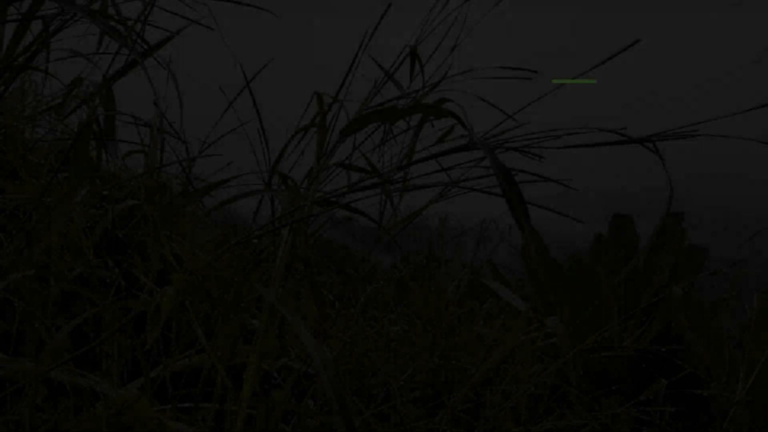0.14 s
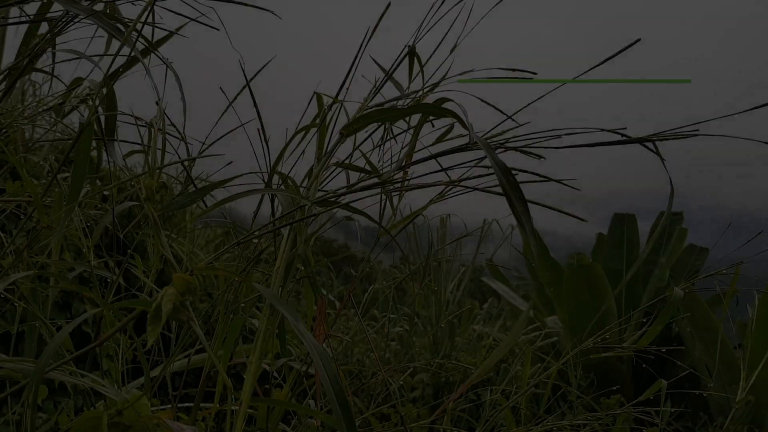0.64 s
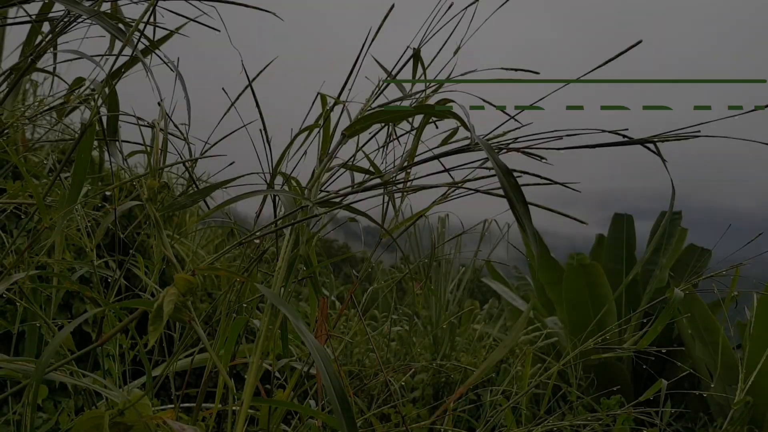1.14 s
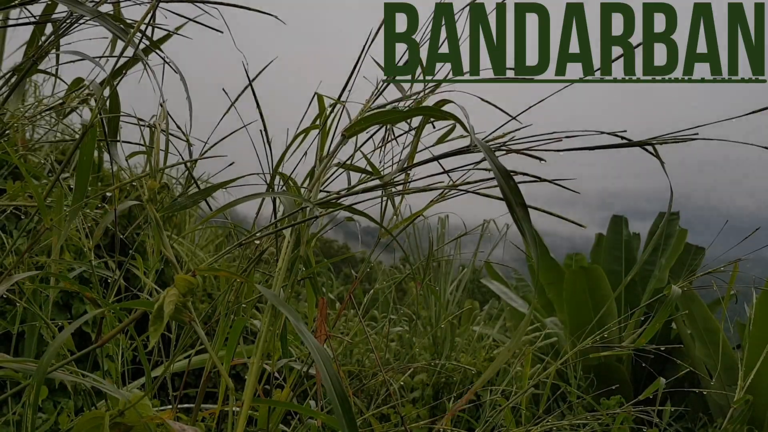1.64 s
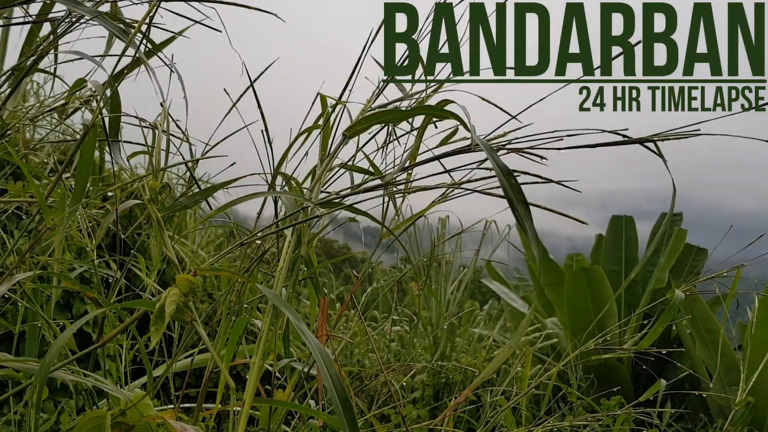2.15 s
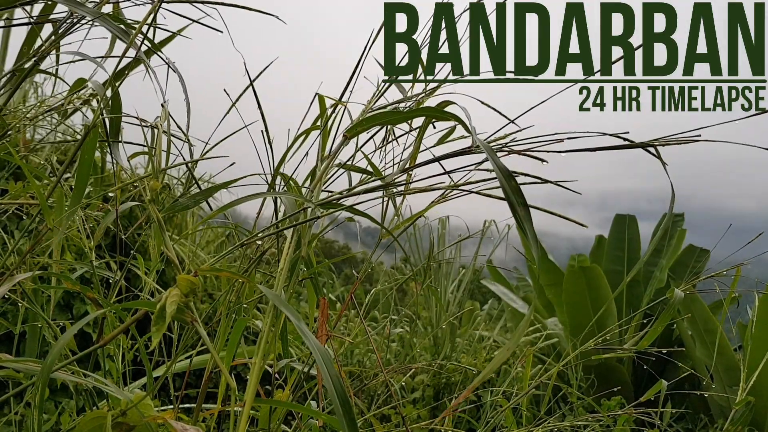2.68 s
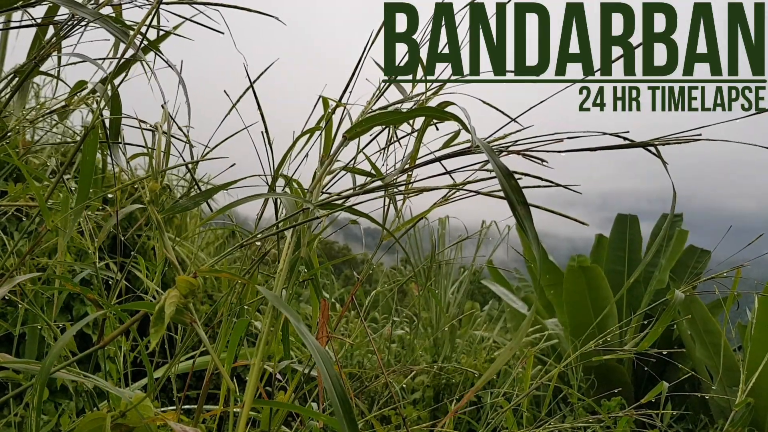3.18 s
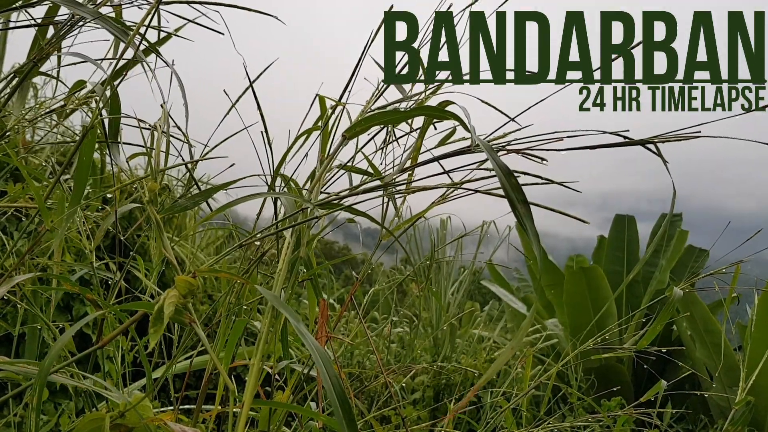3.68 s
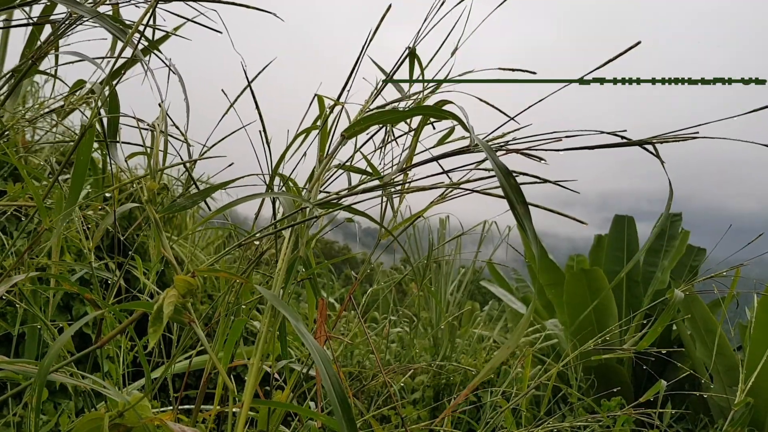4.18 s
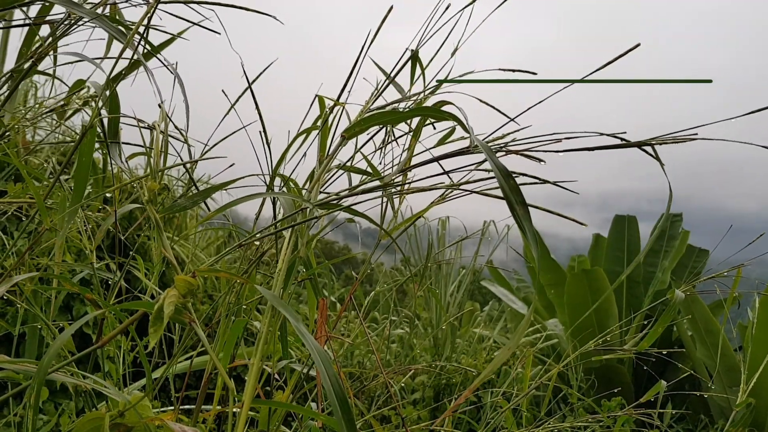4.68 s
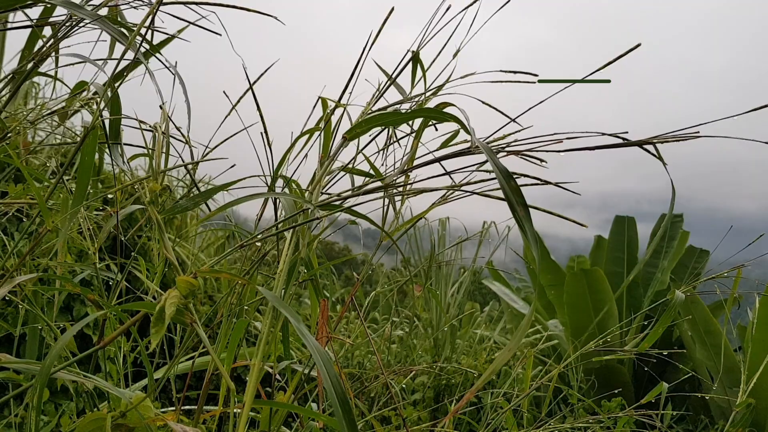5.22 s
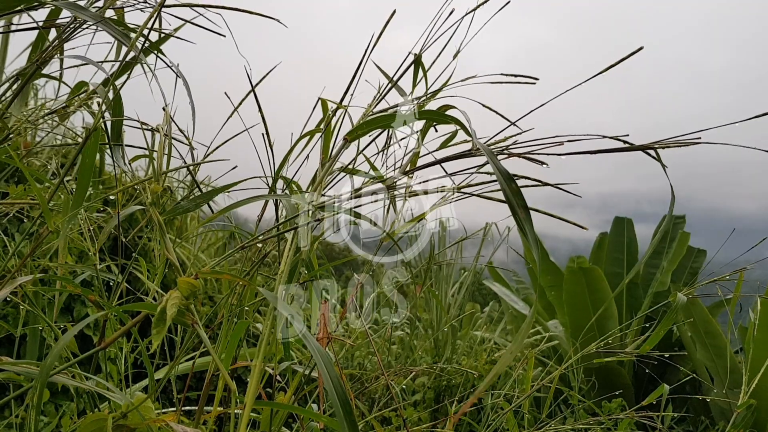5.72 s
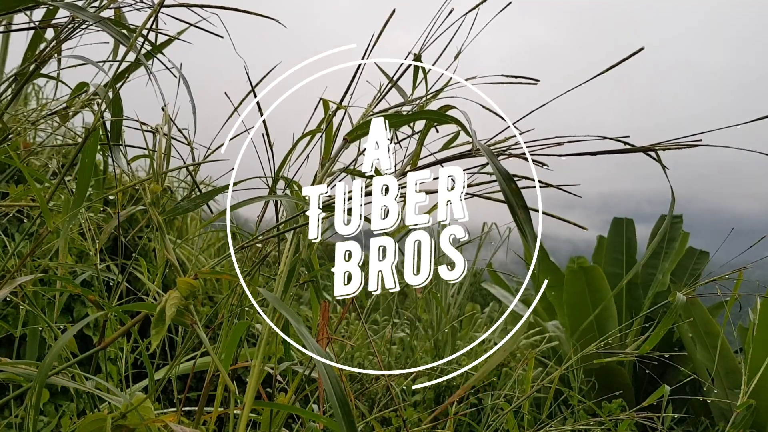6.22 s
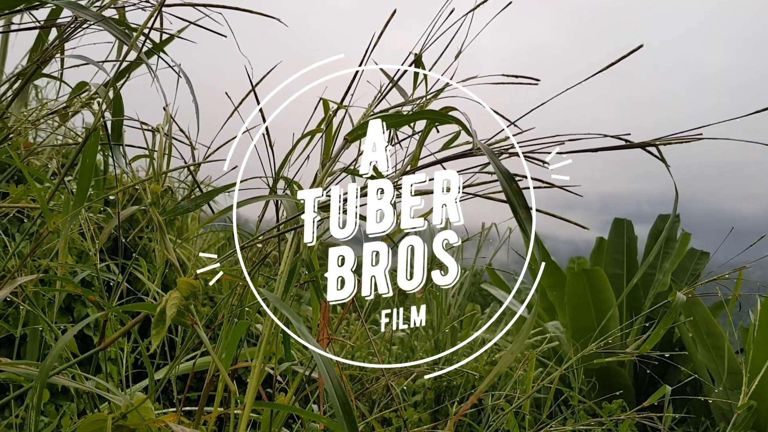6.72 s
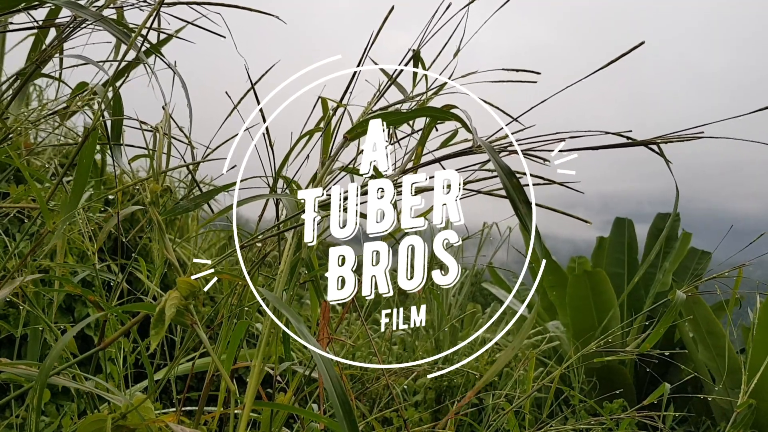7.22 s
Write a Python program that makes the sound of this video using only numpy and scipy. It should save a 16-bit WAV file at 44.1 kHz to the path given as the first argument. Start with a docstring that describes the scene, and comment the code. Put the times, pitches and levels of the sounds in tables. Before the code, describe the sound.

Outdoor grassy hillside, insects fading in over two seconds. On the right a katydid rattles nearly five times a second, a fainter one answering between beats. On the left a cricket buzzes in half-second bursts, with a thinner high buzz coming and going. A loud dry stem tick comes near 2.5 seconds, then wind gusts thump heavily on the microphone to the end.

```python
"""A grassy hillside full of insects: on the right two katydids chirp in turn, as rattles of gliding pulses.
On the left a cricket buzzes in bursts of tonal strokes and a thinner buzz of ringing clicks comes and goes
above it, while a cicada drones in throbbing harmonics and a faint insect hisses in soft swells of grainy noise.
A frog's ringing chips and far birds' gliding notes sound now and then, and stems tick as short modes. Gusts thump
on the microphone as low swings, nearly alike in both channels, over bands of noise for air and a distant chorus."""
import sys
import numpy as np
from scipy import signal
from scipy.io import wavfile
from scipy.ndimage import uniform_filter1d

SR = 44100
rng = np.random.default_rng(int(sys.argv[2]) if len(sys.argv) > 2 else 0)


def digitize_waveform(pressure):
    """Quantize a signal to 16-bit integers and store it at the path in sys.argv[1].

    Rows of a 2-D input are taken as channels; values are limited to [-1, 1].
    """
    field = np.atleast_2d(pressure).T
    bounded = np.clip(field, -1, 1)
    quanta = np.round(bounded * 32767).astype(np.int16)
    wavfile.write(sys.argv[1], SR, quanta)


def gain_from_decibels(decibels):
    """Convert decibel values to linear amplitude factors."""
    exponent = np.asarray(decibels, float) / 20
    return 10 ** exponent


N = 324576
T = np.arange(N) / SR   # time in seconds

# The strongest eddies hitting the microphone. Each row: centre in seconds, level in dB, swing rate in Hz.
EDDIES = [(0.225, -25.5, 58.4), (0.424, -25.5, 59.4), (1.199, -24, 77), (1.498, -21.5, 56),
          (1.564, -24, 67.4), (1.611, -23.5, 66), (2.079, -19.5, 60), (2.157, -19, 88), (2.265, -17, 103),
          (2.429, -17, 70.4), (2.595, -19, 86), (2.665, -16.5, 92), (2.722, -25, 70), (2.983, -11.5, 81),
          (3.034, -17, 80), (3.068, -13.5, 103), (3.123, -16.5, 97.5), (3.201, -18, 59), (3.265, -5, 84),
          (3.293, -11.5, 69.6), (3.394, -12, 92), (3.451, -17.5, 75), (3.549, -11.5, 96),
          (3.689, -16.5, 92), (3.848, -18.5, 56.6), (3.904, -11.5, 64.6), (3.962, -8, 82),
          (4.123, -8.5, 71), (4.259, -3.5, 98), (4.445, -12, 75.6), (4.56, -9, 78.7), (4.701, -16, 70),
          (4.77, -10.5, 124), (5.019, -5.5, 87), (5.064, -16, 76.5), (5.271, -14.5, 89), (5.301, -8, 114),
          (5.323, -12, 127), (5.493, -15, 77), (5.652, -26, 90), (5.682, -12.5, 61.5), (5.837, -13.5, 93),
          (5.893, -11, 71.5), (5.939, -12, 112), (6.022, -15, 122), (6.215, -12, 82), (6.301, -14.5, 69),
          (6.344, -11.5, 82), (6.382, -11, 58), (6.447, -17, 80), (6.515, -3.5, 101), (6.627, -9, 92),
          (6.708, -10.5, 84.5), (6.757, -10.5, 94), (6.837, -12.5, 92), (6.873, -9.5, 83),
          (7.004, -10.5, 66), (7.059, -15, 82), (7.224, -9, 69), (7.303, -11.5, 77)]
# Wind rumble between the thumps. Each row: time in seconds, rms level in dB.
RUMBLE_LEVEL = [(0.0, -37.5), (0.24, -40), (1.0, -39), (1.37, -36.5), (1.74, -36), (2.99, -32.5),
                (3.18, -28.5), (3.71, -30), (3.94, -30), (4.3, -30.5), (4.65, -24.5), (5.27, -28),
                (5.76, -33), (6.03, -25), (6.48, -32), (7.28, -28.5), (7.36, -29.5)]
# Spectrum of the rumble. Each row: frequency in Hz, relative density in dB per Hz.
RUMBLE_SPECTRUM = [(12, -56), (20, 4), (59, 3), (106, -7), (167, -11.5), (420, -45), (600, -39.5),
                   (780, -57), (1320, -120)]
# Spectrum of the air noise. Each row: frequency in Hz, relative density in dB per Hz.
AIR_SPECTRUM = [(88, -30), (150, -3), (391, -4), (1080, -16.5), (2360, -19.5), (4000, -22), (4320, -47.5),
                (4950, -35), (7180, -24), (14500, -25), (16000, -33)]
# Spectrum of the distant insect chorus. Each row: frequency in Hz, relative density in dB per Hz.
CHORUS_SPECTRUM = [(2000, -26), (2400, -26.5), (2750, -21.5), (3200, -14), (3800, -10), (4300, -5.5),
                   (4950, -11), (5500, -12), (6300, -13.5), (7300, -23), (9000, -11.5), (11000, -22),
                   (13600, -20), (14600, -26), (15800, -24)]
# Left-right correlation of the banded noises. Each row: frequency in Hz, correlation from -1 to 1.
LIKENESS = [(30, 1), (270, 0.98), (450, 0.89), (740, 0.71), (1200, 0.64), (2000, 0.7), (3300, -0.047),
            (5500, -0.16), (9000, 0.16), (12500, -0.018), (15000, -0.36)]
# Click rate of the cicada. Each row: time in seconds, rate in Hz.
CICADA_RATE = [(0, 306.0), (1.5, 304.7), (2.5, 302.0), (3.5, 299.7), (4.5, 297.6), (5.5, 295.3),
               (6.5, 293.8), (7.36, 292.5)]
# Cicada harmonics. Each row: time in seconds, relative levels in dB of harmonics 12, 13 and 14.
CICADA_HARMONICS = [(0, -73, -82, -90), (.55, -65.5, -66, -78), (1.0, -67, -75, -72), (1.4, -59, -60, -62),
                    (1.6, -64, -61, -60), (1.95, -57, -76, -60), (2.4, -48, -50.5, -62),
                    (2.75, -54, -53.5, -57), (3.1, -53, -49.5, -62), (3.3, -55, -57, -59),
                    (3.55, -54, -54.5, -67), (3.9, -50.5, -66, -55), (4.3, -51, -69, -62),
                    (4.75, -59, -63, -57), (5.25, -59.5, -56.5, -76), (5.8, -55, -70, -66),
                    (6.3, -58, -62, -68), (6.65, -63, -55, -70), (6.87, -57, -58, -56),
                    (7.1, -56.5, -73, -70), (7.36, -57, -74, -72)]
# Cricket bursts. Each row: start in seconds, end in seconds, length in seconds of the faint trill that follows.
CRICKET_BURSTS = [(-.5, -.02, .22), (0.637, 1.182, 0.12), (1.5417, 2.144, 0.14), (2.5545, 2.648, 0),
                  (2.7913, 3.252, 0.14), (3.584, 4.168, 0.16), (4.5338, 5.117, 0.16), (5.4875, 6.055, .28),
                  (6.454, 7.028, .31)]
# Wing strokes of one katydid chirp. Each row: delay after the beat in seconds, length in seconds,
# relative level in dB, first pitch in Hz, last pitch in Hz.
KATYDID_STROKES = [(-.0100, 0.0067, -8.5, 5275, 4400), (-.0032, 0.0049, -4.5, 4400, 5320),
                   (.0045, 0.00816, -5.5, 5364, 4464), (0.0124, 0.00386, -1, 4434, 5400),
                   (0.0188, 0.0072, -10.5, 5280, 4490), (0.0263, .0045, -8, 4650, 5000),
                   (.034, 0.0047, -13, 5160, 4750), (0.044, 0.0031, -15, 4940, 5000)]
# Far bird notes. Each row: start in seconds, length in seconds, first pitch in Hz, last pitch in Hz,
# rms level in dB before roughness and scattering, roughness from 0 to 1.
BIRD_NOTES = [(0.135, 0.028, 3940, 3790, -55, 0), (1.492, 0.12, 2050, 2010, -57.5, 0.3),
              (1.558, 0.074, 1940, 1680, -58, 0.27), (1.585, 0.077, 2290, 2010, -56.5, 0.5),
              (1.545, 0.062, 652, 653, -51.5, 0.23), (3.274, 0.1, 4950, 3590, -43.5, 0.85),
              (3.701, 0.053, 1660, 1800, -59, 0.3), (3.8, 0.051, 1890, 1940, -58, .1),
              (3.878, 0.086, 2050, 2150, -68, .1), (6.808, 0.087, 5000, 3800, -45, 0.84)]
# Frog chips. Each row: time in seconds, relative level in dB.
FROG_CHIPS = [(1.1468, -38.5), (2.9706, -30.5), (4.7182, -31.5), (6.6463, -32)]
# Faint insect hisses. Each row: centre in seconds, length in seconds, rms level at the peak in dB.
INSECT_HISSES = [(1.97, .15, -62), (3.046, 0.14, -62), (3.3, .08, -52), (3.947, 0.1, -51),
                 (4.933, 0.16, -52), (6.1, 0.13, -55), (6.815, .1, -64)]
# Stems ticking. Each row: time in seconds, relative level in dB, left over right in dB,
# tilt of the modes in dB per octave above 5 kHz.
STEM_TICKS = [(2.5366, -9.5, 0.5, 9), (3.291, -41, -3, 0), (3.584, -36, -9, 19.5), (4.9734, -37, 17, -4),
              (6.378, -33, -4, -6), (7.0042, -30, -12, -10)]
# Modes of a dry stem. Each row: frequency in Hz, relative level in dB, 60 dB decay time in seconds.
STEM_MODES = [(2740, -6, 0.021), (2870, -10, 0.013), (3800, 3.5, 0.012), (4400, -3, 0.0092),
              (5000, 4, 0.0049), (5730, 3, 0.0065), (6600, 1, .004), (8450, -19, 0.01), (9700, -12, 0.004),
              (10950, -11, 0.0067), (12200, -12, .003), (13900, -10, 0.003), (15100, -14, 0.0067)]


def rms_one(x):
    """Normalisation: divide a signal by its root mean square."""
    return x / np.sqrt(np.mean(x ** 2) + 1e-20)


def at_hz(points, hz):
    """Interpolation of a spectrum along a logarithmic frequency axis."""
    points_hz, values = np.transpose(points)
    return np.interp(np.log(hz), np.log(points_hz), values)


def band_pass(x, low_hz, high_hz):
    """Butterworth band-pass: keeps the part of a spectrum between two corners."""
    return signal.sosfilt(signal.butter(2, [low_hz, high_hz], "band", fs=SR, output="sos"), x)


def drift(rate):
    """Slow random modulation: noise through two equal poles with corners at rate (Hz), rms 1."""
    # one value every 40 samples; the first 2000 let the filter settle
    r = np.exp(-80 * np.pi * rate / SR)
    slow = signal.lfilter([1], [1, -2 * r, r * r], rng.standard_normal(N // 40 + 2002))[2000:]
    return np.interp(np.arange(N) / 40, np.arange(len(slow)), rms_one(slow))


def ring(clicks, hz, t60):
    """Damped resonance: a unit click sets off a sine of height near 1 that falls 60 dB in t60 seconds."""
    r = gain_from_decibels(-60 / (t60 * SR))
    w = 2 * np.pi * hz / SR
    return signal.lfilter([0, np.sin(w)], [1, -2 * r * np.cos(w), r * r], clicks + 1e-18)


def sweep(length_s, from_hz, to_hz):
    """Frequency glide: a tone pulse under a half-sine envelope, its pitch moving linearly."""
    n = round(length_s * SR)
    turns = np.cumsum(np.linspace(from_hz, to_hz, n)) / SR
    return np.sin(np.pi * np.arange(n) / n) * np.sin(2 * np.pi * turns)


def banded_noise(spectrum, shared_db, own_db, per_octave):
    """Band-wise noise: each stereo band has its own level, flicker and interaural correlation; total rms 1."""
    low_hz, high_hz = spectrum[0][0], spectrum[-1][0]
    edges = np.geomspace(low_hz, high_hz, int(per_octave * np.log2(high_hz / low_hz)) + 1)
    out, together = 0, drift(15.4)
    white = rng.standard_normal((2, 2, N))   # neighbouring bands use different noise
    for k, (low, high) in enumerate(zip(edges, edges[1:])):
        mid, side = band_pass(white[k % 2], low, high)
        hz = np.sqrt(low * high)
        alike = np.clip(at_hz(LIKENESS, hz), -1, 1)
        gain = gain_from_decibels(at_hz(spectrum, hz) + shared_db * together + own_db * drift(20.0))
        out = out + gain * (np.sqrt(1 + alike) * mid + np.sqrt(1 - alike) * side * [[1], [-1]])
    return rms_one(out)


def in_grass(x, pan_db, lag, scatter_db, t60):
    """Scattering: level and delay place a source; swaying leaves add a short fluttering tail for each ear."""
    # positive pan_db is left; lag delays the right ear by that many samples
    t = T[:round(t60 * SR)]
    tail = rng.standard_normal((2, len(t))) * gain_from_decibels(-60 * t / t60)
    tail = gain_from_decibels(scatter_db) * tail / np.sqrt(np.sum(tail ** 2, axis=1, keepdims=True))
    flutter = np.array([drift(90), drift(90)])
    direct = np.array([x, np.roll(x, lag)]) * gain_from_decibels([[pan_db / 2], [-pan_db / 2]])
    return direct + flutter * signal.fftconvolve([x, x], tail, axes=1)[:, :N]


def strokes(bursts, per_s, jitter_s, uneven_db):
    """Stridulation timing: clicks at a nearly steady stroke rate, swelling at the start of each burst."""
    out = np.zeros(N)
    for start, end, swell, level_db in bursts:
        late, size = rng.standard_normal((2, 200))
        s = np.arange(200) / per_s
        s = s - .002 * np.sin(np.pi * np.clip(s / (end - start), 0, 1))   # a little quicker at first
        at = np.round((start + s + jitter_s * late) * SR).astype(int)
        keep = (s < end - start) & (at >= 0) & (at < N)
        height = gain_from_decibels(level_db + uneven_db * size) * np.clip(0.42 + s / swell, 0, 1)
        out[at[keep]] += height[keep]
    return out


def with_companions(eddies):
    """Eddy pairing: each strong eddy brings a weaker one just before or after it."""
    out = []
    for (s, level_db, hz), (side, gap, size, pitch) in zip(eddies, rng.random((len(eddies), 4))):
        near_s = s + np.sign(side - .5) * (0.01707 + .02 * gap)
        near_s = min(near_s, eddies[-1][0])
        out += [(s, level_db, hz), (near_s, level_db - 4 - 7 * size, 82 * (1 + .5 * (pitch - .5)))]
    return out


def wind():
    """Turbulence: each eddy is a thump of about one swing with a sharper edge, over a lumpy rumble."""
    thumps, t = np.zeros((2, N)), np.arange(-2000, 2000) / SR
    eddies = with_companions(EDDIES)
    for (s, level_db, hz), (turn, edge_turn, lean) in zip(eddies, rng.random((len(eddies), 3))):
        at = round(s * SR) + np.arange(-2000, 2000)
        swing = np.exp(-(t * hz / 0.5) ** 2) * np.cos(2 * np.pi * (hz * t + turn))
        edge = np.exp(-(t * hz / 0.28) ** 2) * np.cos(2 * np.pi * (1.565 * hz * t + edge_turn))
        ear_db = 1.7 * (lean - .5) * np.array([[1], [-1]])
        thumps[:, at] += gain_from_decibels(level_db + ear_db) * (swing + gain_from_decibels(-9.5) * edge)
    rumble = banded_noise(RUMBLE_SPECTRUM, shared_db=2.0, own_db=4.0, per_octave=2)
    wake = uniform_filter1d(np.abs(thumps), size=2500)   # turbulence swells around each eddy
    return thumps + (gain_from_decibels(np.interp(T, *np.transpose(RUMBLE_LEVEL))) + 0.46 * wake) * rumble


def air_noise():
    """Broadband background: steady noise of the air whose bands flicker slightly."""
    return gain_from_decibels(-49.5) * banded_noise(AIR_SPECTRUM, shared_db=0.5, own_db=1.1, per_octave=2)


def far_chorus():
    """Superposition: many distant insects merge into coloured noise that rises at the start."""
    rise = np.interp(T, [0, 2.57], [0.25, 1])   # seconds, share of the full level
    return gain_from_decibels(-46) * rise * banded_noise(CHORUS_SPECTRUM, shared_db=.3, own_db=.7, per_octave=5)


def top_hiss():
    """Narrow-band noise: far insects near the top of hearing flicker gently, nearly alike in both ears."""
    near, apart = rng.standard_normal(N), rng.standard_normal((2, N))
    band = band_pass(near + .4 * apart, 14900, 15700)
    return gain_from_decibels(-62.5 + 1.5 * drift(30)) * rms_one(band)


def cicada():
    """Harmonic series: regular clicks heard as three harmonics near the body resonance, dipping between throbs."""
    s, *levels_db = np.transpose(CICADA_HARMONICS)
    turns = np.cumsum(np.interp(T, *np.transpose(CICADA_RATE)) + 0.44 * drift(11.6)) / SR
    dip_s, throb_s = 2.492, .1786   # time of one dip, and seconds between dips
    phase = ((T - dip_s) / throb_s + .04 * drift(3)) % 1
    throb = np.abs(np.sin(np.pi * phase ** 1.4)) ** .9   # slow swell, quick drop
    out = np.zeros((2, N))
    for k, level_db in enumerate(levels_db):
        flicker_db = 2 * np.array([drift(14.0), drift(5.3)])
        gain = gain_from_decibels(np.interp(T, s, level_db) + 7 + flicker_db)
        ear_turns = rng.random() + np.array([[0], [.2]])
        out += gain * throb * np.sin(2 * np.pi * ((12 + k) * turns + ear_turns))
    return out * gain_from_decibels([[-1.5], [1.5]])


def cricket():
    """Stridulation: the closing stroke is a falling tone, the opening one fainter and nearly half a beat later."""
    stroke = np.zeros(round(.015 * SR))
    closing, opening = sweep(.0075, 9380, 9020), gain_from_decibels(-7) * sweep(.0075, 9200, 8800)
    stroke[:len(closing)] += closing
    stroke[round(.0072 * SR):][:len(opening)] += opening
    level_db, trill_db, pause_s = -37, -12.5, .02   # the trill is relative to the burst
    bursts = [(start, end, 0.21, level_db) for start, end, trill in CRICKET_BURSTS]
    bursts += [(end + pause_s, end + pause_s + trill, .03, level_db + trill_db)
               for start, end, trill in CRICKET_BURSTS if trill > 0]
    clicks = strokes(bursts, per_s=62.05, jitter_s=.00002, uneven_db=.8)
    song = signal.fftconvolve(clicks, stroke)[:N]
    rasp = band_pass(rng.standard_normal(N), 7800, 10500)
    rasp = gain_from_decibels(-6) * rasp * uniform_filter1d(np.abs(song), size=60)   # noise of the wing file rides on the tone
    return in_grass(song + rasp, pan_db=10, lag=2, scatter_db=-6, t60=.08)


def katydid():
    """Pulse train: each chirp is a rattle of wing strokes, falling and rising in turn, that grows, then dies away."""
    out, beat = np.zeros(N + SR), np.arange(35)
    # first beat, beat length and its growth per beat, all in seconds
    beats_s = .0374 + .214468 * beat + .000029 * beat ** 2 / 2
    for s, (late, loud) in zip(beats_s, rng.standard_normal((len(beat), 2))):
        chance = rng.standard_normal((len(KATYDID_STROKES), 2))
        for (after, length, db, from_hz, to_hz), (early, size) in zip(KATYDID_STROKES, chance):
            stroke = sweep(length, from_hz, to_hz)
            at = round((s + .0015 * late + after + .0003 * early) * SR)
            out[at:at + len(stroke)] += gain_from_decibels(-28 + 0.25 * loud + db + 0.68 * size) * stroke
    return in_grass(out[:N], pan_db=-11, lag=2, scatter_db=-3, t60=.2)


def answering_katydid():
    """Pulse train: a fainter katydid answers between the beats with even pulses that swell, then fade."""
    out, after = np.zeros(N + SR), .0044 * np.arange(15)
    rise_s, fall_db_per_s = 0.019, 330
    shape_db = -8 * np.clip(1 - after / rise_s, 0, 1) - fall_db_per_s * np.maximum(after - rise_s, 0)
    beats_s = .1335 + .21482 * np.arange(34)
    for s, (late, loud) in zip(beats_s, rng.standard_normal((34, 2))):
        chance = rng.standard_normal((len(after), 4))
        for delay, db, (early, size, pitch, glide) in zip(after, shape_db, chance):
            middle_hz = 4844 + 120 * pitch
            pulse = sweep(0.005, middle_hz + 200 * glide, middle_hz - 200 * glide)
            at = round((s + .0015 * late + delay + .0006 * early) * SR)
            out[at:at + len(pulse)] += gain_from_decibels(-37.5 + 2 * loud + db + 2.0 * size) * pulse
    return in_grass(out[:N], pan_db=-9, lag=2, scatter_db=-3, t60=.2)


def birds():
    """Frequency and amplitude modulation: gliding notes, the rough ones broken up by a fast flutter."""
    out = np.zeros(N)
    flutter = drift(800)
    for s, length, from_hz, to_hz, level_db, rough in BIRD_NOTES:
        note, at = sweep(length, from_hz, to_hz), round(s * SR)
        broken = 1 - rough + rough * flutter[at:at + len(note)]
        out[at:at + len(note)] += 2 * gain_from_decibels(level_db) * note * broken   # 2 brings the pulse to rms 1
    return in_grass(out, pan_db=-1.5, lag=0, scatter_db=-3, t60=.25)


def high_buzz():
    """Excited resonance: quick paired strokes ring a narrow and a broad resonance."""
    length_s, swell_s, level_db = .92, 0.55, -51.5
    bursts = [(s, s + length_s, swell_s, level_db) for s in .21 + 1.344 * np.arange(6)]
    clicks = strokes(bursts, per_s=130.0, jitter_s=.00002, uneven_db=2.0)
    clicks = clicks + np.roll(clicks, round(.0032 * SR))
    buzz = ring(clicks, 10440, 0.019) + gain_from_decibels(-3) * ring(clicks, 8200, 0.0015)
    return in_grass(buzz, pan_db=14.5, lag=1, scatter_db=-12.5, t60=.15)


def frog():
    """Impulse and beating: a lower snap, with a held note near 3.8 kHz that throbs as it fades."""
    clicks = np.zeros(N)
    for s, level_db in FROG_CHIPS:
        clicks[round(s * SR)] = gain_from_decibels(level_db)
    t = T[:round(.06 * SR)]
    envelope = (1 - np.exp(-t / 0.0051)) * gain_from_decibels(-6000 * t ** 2)
    throb = 0.77 + 0.33 * np.cos(2 * np.pi * 130 * t)
    tone = np.sin(2 * np.pi * (3810 * t + 1.7 * np.exp(-t / 0.0031)))   # glides up into the note
    held = signal.fftconvolve(clicks, envelope * throb * tone)[:N]
    snap = band_pass(ring(clicks, 3504, 0.028), 3100, 4300)
    return in_grass(gain_from_decibels(4.0) * snap + gain_from_decibels(-2.0) * held, pan_db=-1.5, lag=0, scatter_db=-3, t60=.2)


def insect_hisses():
    """Band-limited noise: a faint insect hisses in soft grainy swells, roughly once a second."""
    s, length, level_db = np.transpose(INSECT_HISSES)
    swell = sum(gain_from_decibels(db) * np.exp(-((T - at) / width) ** 2) for at, width, db in zip(s, length / 2, level_db))
    grains = rng.standard_normal((2, N)) * gain_from_decibels(5.5 * np.array([drift(60), drift(60)]))
    return swell * rms_one(band_pass(grains, 5300, 7400))


def ticks():
    """Modal impact: a dry stem snaps close by, a broad crack and a few short modes."""
    s, level_db, pan_db, tilt_db = np.transpose(STEM_TICKS)
    at = np.round(s * SR).astype(int)
    tilt, clicks = np.zeros(N), np.zeros((2, N))
    tilt[at] = tilt_db
    clicks[:, at] = gain_from_decibels(level_db + np.array([pan_db, -pan_db]) / 2)
    crack = band_pass(clicks, 1200, 7000)
    modes = 0
    for hz, db, t60 in STEM_MODES:
        octaves = max(np.log2(hz / 5000), 0)
        modes = modes + gain_from_decibels(db - 11.5) * ring(clicks * gain_from_decibels(tilt * octaves), hz, t60)
    modes = signal.sosfilt(signal.butter(1, 1200, "high", fs=SR, output="sos"), modes)
    return gain_from_decibels(-7.5) * crack + modes


def scene():
    """Superposition: wind, air and chorus under the insects, calls and ticks."""
    background = wind() + air_noise() + far_chorus()
    swell_in = np.minimum(T / 2.28, 1)   # these insects rise evenly from silence over 2.28 s
    insects = swell_in * (top_hiss() + cricket() + katydid() + answering_katydid() + high_buzz())
    return background + cicada() + insects + birds() + frog() + insect_hisses() + ticks()


def top_cut(x):
    """Nothing passes above the cut-off."""
    return signal.sosfilt(signal.butter(12, 17130, fs=SR, output="sos"), x)


def record(dry):
    """Low-pass filtering: a steep elliptic filter cuts the top above 15.8 kHz."""
    low_pass = signal.ellip(12, .5, 60, 15800, fs=SR, output="sos")   # 0.5 dB ripple, 60 dB rejection
    mix = signal.sosfilt(low_pass, dry)
    return top_cut(mix)


dry = scene()
out = record(dry)
digitize_waveform(out)
```